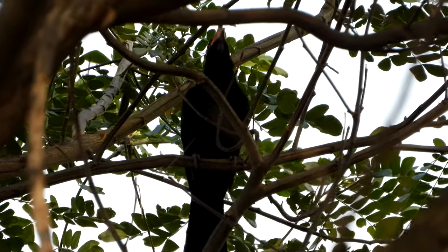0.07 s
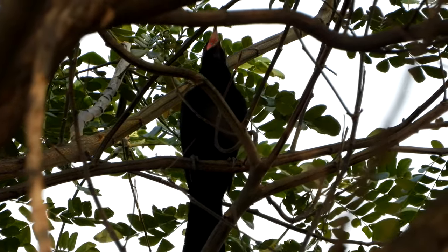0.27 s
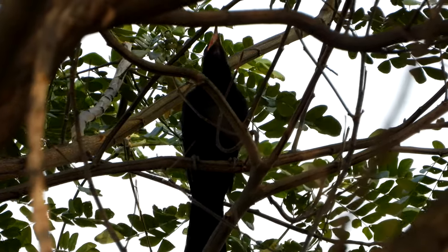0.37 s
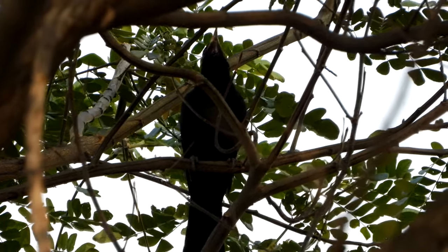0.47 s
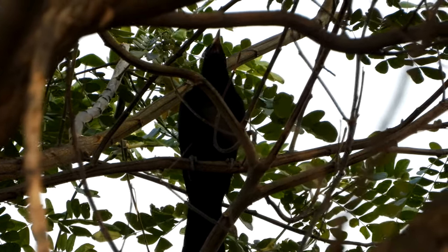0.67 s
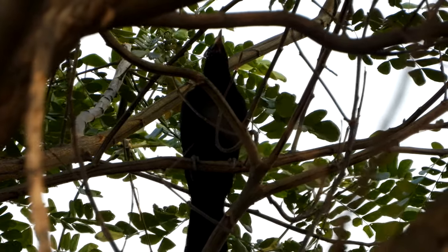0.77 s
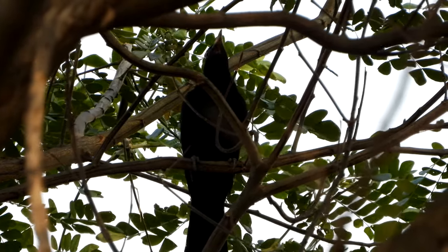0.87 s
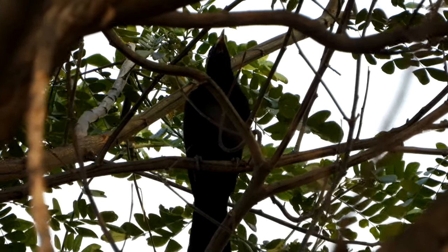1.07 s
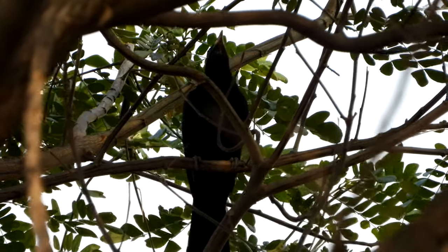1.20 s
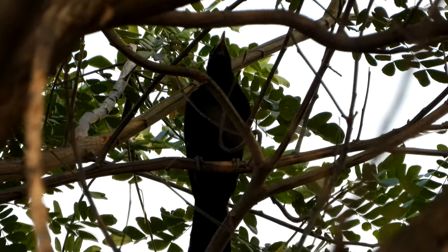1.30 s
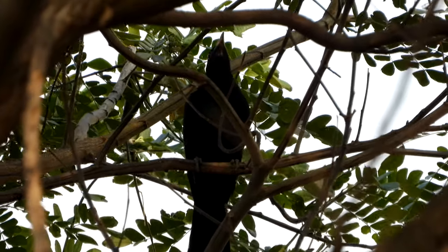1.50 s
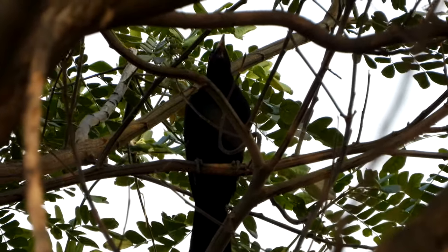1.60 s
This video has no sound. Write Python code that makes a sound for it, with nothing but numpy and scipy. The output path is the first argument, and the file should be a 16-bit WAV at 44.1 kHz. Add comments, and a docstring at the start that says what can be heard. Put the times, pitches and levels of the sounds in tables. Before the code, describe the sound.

A bird gives one loud, gliding whistle overhead, with faint distant chirps outdoors.

```python
"""Under a tree outdoors, on a stereo pair of microphones. A koel calls once from overhead: a loud,
nearly pure whistle that sags, swells upward and falls away, just overloading at its loudest.
Trunks and leaves scatter it into a fading tail. Far off, small birds chirp, and a few low hoots
and dull thuds sound over a faint hush."""
import sys
import numpy as np
from scipy import signal
from scipy.fft import rfft, irfft
from scipy.io import wavfile
from scipy.ndimage import uniform_filter1d

SR = 44100
rng = np.random.default_rng(int(sys.argv[2]) if len(sys.argv) > 2 else 0)


def inscribe(sig):
    """Save sig as 16-bit PCM at rate SR to the path in sys.argv[1].

    A 1-D sig is mono; a 2-D sig holds one channel per row.
    Samples are clipped to [-1, 1] before scaling.
    """
    pcm = np.round(np.clip(np.atleast_2d(sig).T, -1, 1) * 32767)
    wavfile.write(sys.argv[1], SR, pcm.astype(np.int16))


N = 72765
T = np.arange(N) / SR

# The whistle's glide. Each row: time in seconds, pitch in Hz.
KOEL_PITCH = [(0.188, 1169), (0.205, 1336), (0.232, 1291), (0.275, 1243), (0.33, 1217), (0.375, 1230),
              (0.41, 1290), (0.45, 1429), (0.485, 1534), (0.515, 1556), (0.555, 1442), (0.6, 1289),
              (0.655, 1047), (0.71, 830)]
# The whistle's loudness as heard under the tree, with brief dips where echoes interfere.
# Each row: time in seconds, level in dB.
KOEL_LEVEL = [(0.185, -41), (0.205, -20.5), (0.23, -14), (0.26, -14.5), (0.273, -24.5), (0.283, -12),
              (0.33, -15.5), (0.37, -13), (0.394, -14), (0.405, -9.5), (0.43, -9.5), (0.445, -5),
              (0.515, -3.5), (0.57, -7.5), (0.612, -13), (0.635, -7), (0.65, -19), (0.685, -25.5),
              (0.71, -37.5)]
# The overtones die before the whistle does. Each row: time in seconds, their shared level in dB.
KOEL_BRIGHTNESS = [(0.19, -28), (0.205, -17.5), (0.245, -12.5), (0.33, -16), (0.42, -12.5), (0.47, -7.5),
                   (0.52, -10), (0.56, -9.5), (0.6, -10.5), (0.66, -38)]
# Each row: multiple of the pitch, dB on top of the shared level, extra dB at the harsh start,
# extra dB at the top of the swell.
KOEL_OVERTONES = [(2, -43, 27.5, 8.5), (3, -35.5, 4, 7.5), (4, -26.5, 5.5, -5.5), (5, -22, -4, -1.5),
                  (6, -36.5, 17, -3.5), (7, -35.5, -2, 1.5), (8, -46, 3, 2), (9, -37.5, 3, -4)]

def koel(jitter=0.0027, shimmer_db=3.5, hoarse_db=-4, hoarse_hz=170, rasp_hz=232):
    """Overhead, one gliding whistle with a raspy start; its weak overtones turn hoarse as it swells."""
    hz = curve(KOEL_PITCH, smooth_s=0.016) * (1 + jitter * wander(102))
    phase = 2 * np.pi * np.cumsum(hz) / SR
    gain = undb(curve(KOEL_LEVEL, smooth_s=0.0094))
    sounding = (T > KOEL_LEVEL[0][0]) & (T < KOEL_LEVEL[-1][0])
    gate = uniform_filter1d(1. * sounding, size=200)
    onset = np.exp(-((T - 0.199) / 0.027) ** 2)
    swell = np.exp(-((T - 0.516) / 0.081) ** 4)
    hoarseness = undb(hoarse_db) * gain / gain.max()
    bright_db = curve(KOEL_BRIGHTNESS, smooth_s=0.006)
    voice = gain * np.sin(phase)
    for multiple, db, onset_db, swell_db in KOEL_OVERTONES:
        angle = multiple * phase
        noise_skirt = wander(hoarse_hz) * np.sin(angle) + wander(hoarse_hz) * np.cos(angle)
        level_db = bright_db + db + onset_db * onset + swell_db * swell + shimmer_db * wander(49)
        voice += undb(level_db) * (np.sin(angle) + hoarseness * noise_skirt)
    rasp_depth = 0.73 * np.exp(-((T - 0.1942) / 0.013) ** 2)
    rasp = 1 + rasp_depth * np.sin(2 * np.pi * rasp_hz * T)
    return np.sqrt(2) * voice * gate * rasp


# Echoes off nearby trunks and the ground. Each row: delay in seconds, level in dB.
TRUNK_ECHOES = [(0.024, -16.5), (.036, -20), (0.061, -23), (.0685, -24), (.098, -20.5)]
# Scatter from twigs, near crowns and far trees.
# Each row: delay in seconds, seconds to fade by 60 dB, level in dB, extra dB in the treble.
FOLIAGE_SCATTER = [(.001, .07, -21, 18), (0.016, 0.385, -13, 10), (0.053, 1.304, -17, 5)]
# The tone of that scatter. Each row: frequency in Hz, gain in dB.
FOLIAGE_COLOUR = [(800, 4.5), (1000, 1.5), (1250, 2), (1550, 0), (3000, 1.5), (7500, -1)]

def trees(calls, treble_hz=3000, rise_s=0.0078, left_lead_s=5.6e-5):
    """Calls reach the microphones directly, as echoes, and as dense scatter, brightest from close by."""
    size = 2 * N
    f = np.fft.rfftfreq(size, 1 / SR)
    paths = 1 + sum(undb(db) * np.exp(-2j * np.pi * f * delay) for delay, db in TRUNK_ECHOES)
    treble = f ** 4 / (f ** 4 + treble_hz ** 4)
    likeness = 0.72 / (1 + (np.fft.rfftfreq(N, 1 / SR) / 6000) ** 2)
    for delay, t60, db, treble_db in FOLIAGE_SCATTER:
        age = np.maximum(T - delay, 0)
        fade = (1 - np.exp(-age / rise_s)) * np.exp(-np.log(1000) * age / t60)
        tail = unit(fade) / np.sqrt(N) * stereo_noise(1, likeness)
        colour = undb(db + treble_db * treble + by_freq(FOLIAGE_COLOUR, f))
        paths = paths + rfft(tail, size) * colour
    mic_timing = np.array([np.exp(2j * np.pi * f * left_lead_s), np.ones(len(f))])
    at_mics = irfft(rfft(calls, size) * mic_timing * paths, size)[:, :N]
    return at_mics * pan(-1.6)


# Small birds far off. Each row: start and length in seconds, first and last pitch in Hz, level in dB.
BIRD_CHIRPS = [(.105, 0.06, 3870, 3880, -38.5), (.163, 0.03, 1647, 1670, -36.5),
               (.925, .08, 3356, 3037, -45), (1.03, .03, 5950, 5850, -41), (1.305, .075, 3900, 3830, -42)]
# Low hoots in the distance, with the same columns.
LOW_HOOTS = [(.52, 0.237, 276, 303, -49), (1.485, .13, 294, 288.3, -43.5)]

def far_calls(notes, waver):
    """Faint, slightly unsteady gliding notes, a long way from the microphones."""
    calls = np.zeros(N)
    for start, length, first_hz, last_hz, db in notes:
        progress = np.clip((T - start) / length, 0, 1)
        hz = (first_hz + (last_hz - first_hz) * progress) * (1 + waver * wander(148))
        arch = np.sqrt(4 * progress * (1 - progress))
        calls += undb(db) * arch * np.sin(2 * np.pi * np.cumsum(hz) / SR)
    return calls


# Each row: start in seconds, centre in Hz, width in Hz, decay in seconds, level in dB.
FAR_THUDS = [(.49, 310, 70, 0.027, -41), (1.215, 470, 150, 0.022, -39), (1.279, 493, 147, 0.012, -27),
             (1.468, 500, 140, 0.013, -36)]

def thuds(attack_s=0.003):
    """Dull thuds from far away: narrow bands of low noise that fade quickly."""
    f = np.fft.rfftfreq(N, 1 / SR)
    out = np.zeros((2, N))
    for start, hz, width, decay, db in FAR_THUDS:
        age = np.maximum(T - start, 0)
        body = stereo_noise(1 / (1 + (2 * (f - hz) / width) ** 2), likeness=0.8)
        out += undb(db) * (1 - np.exp(-age / attack_s)) * np.exp(-age / decay) * body
    return out


# The tone of the open air. Each row: frequency in Hz, relative spectral density in dB.
AIR_SPECTRUM = [(15, -69), (25, -39), (113, -11.5), (291, -12), (371, -8), (710, -3.5), (791, -8),
                (1470, -6.5), (1640, -10), (2460, -12.5), (3780, -12), (4100, -12.5), (15800, -23)]
# How alike the two microphones hear it. Each row: frequency in Hz, left-right correlation.
AIR_LIKENESS = [(30, .3), (120, .5), (500, 0.55), (1200, 0.56), (2500, 0.28), (6000, 0), (15000, 0)]

def hush(level_db=-37, waver_db=1.2, waver_below_hz=900):
    """Outdoor air all around: a gently wavering low rush under a smooth, wide hiss."""
    f = np.fft.rfftfreq(N, 1 / SR)
    air = stereo_noise(undb(by_freq(AIR_SPECTRUM, f)), by_freq(AIR_LIKENESS, f))
    rush = irfft(rfft(air) / (1 + (f / waver_below_hz) ** 4), N)
    air += rush * (undb(waver_db * wander(6.5)) - 1)
    return air * undb(level_db) * pan(-0.9)


def undb(db):
    """Decibels to gain."""
    return 10 ** (np.asarray(db) / 20)


def pan(left_minus_right_db):
    """Gains for the left and right microphones."""
    return undb(np.array([[0.5], [-0.5]]) * left_minus_right_db)


def curve(rows, smooth_s):
    """Join (seconds, value) rows and round the corners."""
    return uniform_filter1d(np.interp(T, *np.array(rows, float).T), max(1, int(smooth_s * SR)))


def by_freq(rows, hz):
    """Read (Hz, value) rows on a log-frequency axis."""
    f, values = np.array(rows, float).T
    return np.interp(np.log(hz + 1), np.log(f), values)


def unit(x):
    """Scale to rms 1."""
    return x / np.sqrt(np.mean(x ** 2))


def wander(rate_hz):
    """Smooth random drift with rms 1."""
    f = np.fft.rfftfreq(N, 1 / SR)
    return unit(irfft(rfft(rng.standard_normal(N)) / (1 + (f / rate_hz) ** 4), N))


def stereo_noise(gain, likeness):
    """Two noises with a given spectrum and left-right correlation."""
    mid, side = rfft(rng.standard_normal((2, N)))
    pair = np.sqrt(1 + likeness) * mid + np.sqrt(1 - likeness) * side * np.array([[1], [-1]])
    return unit(irfft(gain * pair, N))


def scene():
    """From under the tree: the birds through the foliage, over distant thuds and the hush."""
    calls = koel() + far_calls(BIRD_CHIRPS, waver=0.0084) + far_calls(LOW_HOOTS, waver=0.0091)
    return trees(calls) + thuds() + hush()


def record(dry, top_hz=15900):
    """The recorder clips at full scale and cuts the highest treble."""
    lowpass = signal.ellip(8, 0.1, 70, top_hz, fs=SR, output="sos")
    return signal.sosfilt(lowpass, np.clip(dry, -1, 1))


dry = scene()
out = record(dry)
inscribe(out)
```